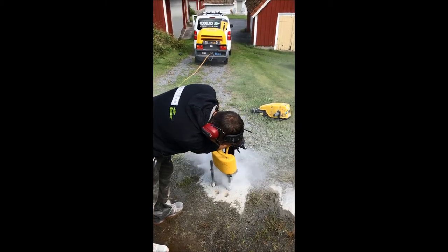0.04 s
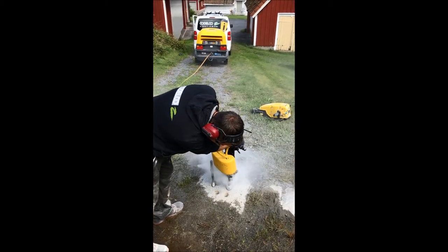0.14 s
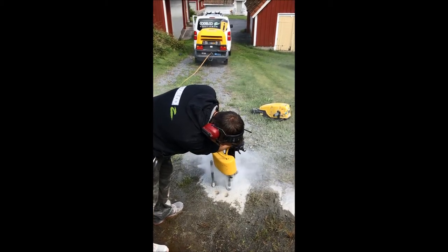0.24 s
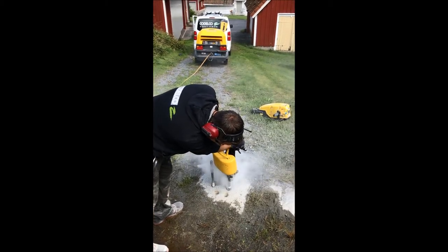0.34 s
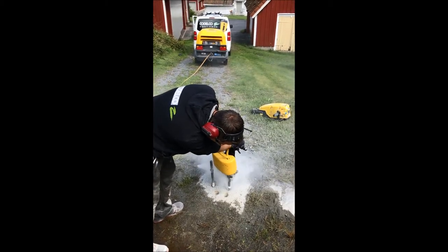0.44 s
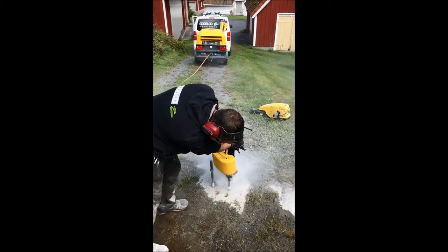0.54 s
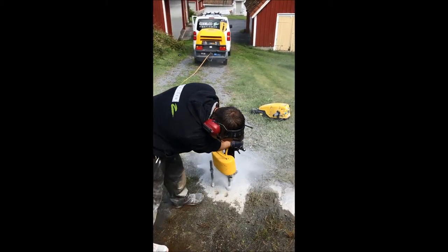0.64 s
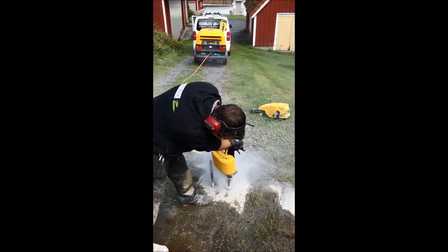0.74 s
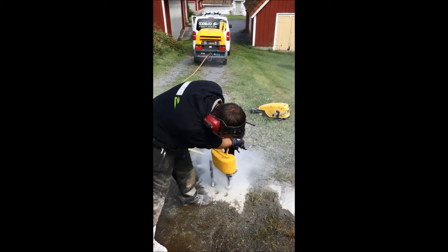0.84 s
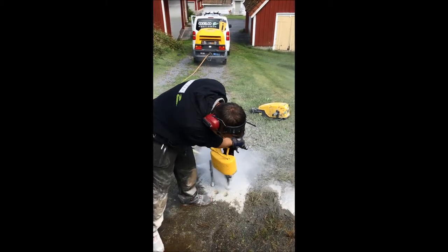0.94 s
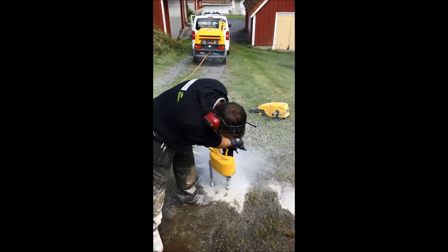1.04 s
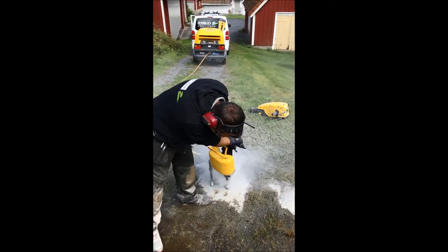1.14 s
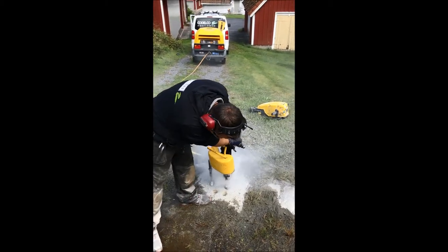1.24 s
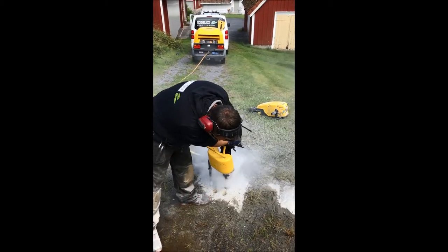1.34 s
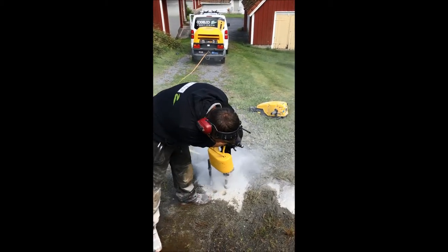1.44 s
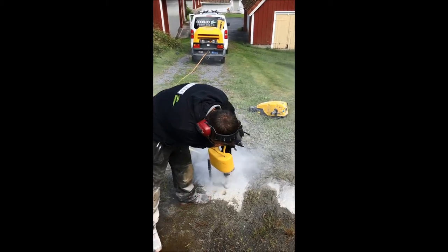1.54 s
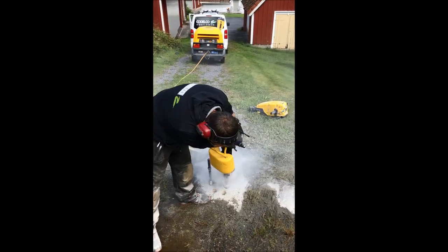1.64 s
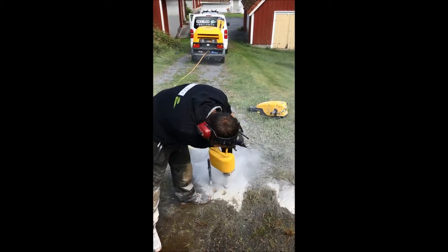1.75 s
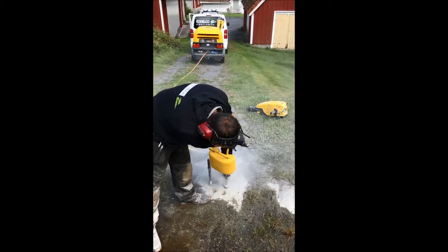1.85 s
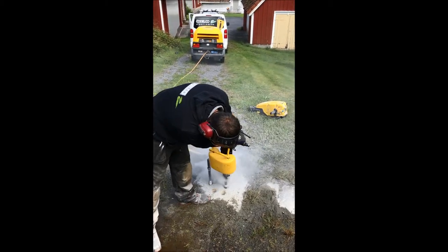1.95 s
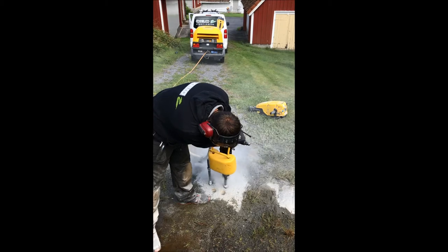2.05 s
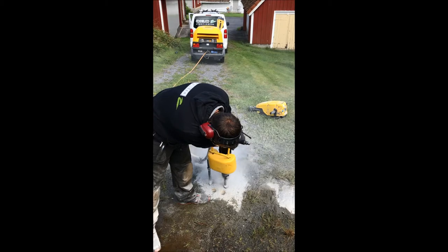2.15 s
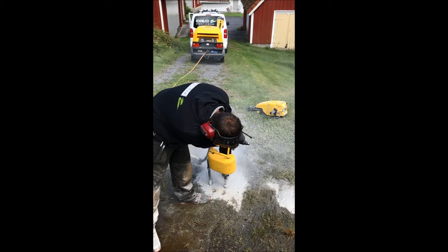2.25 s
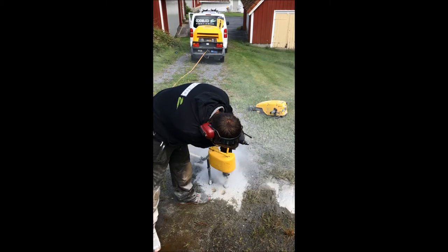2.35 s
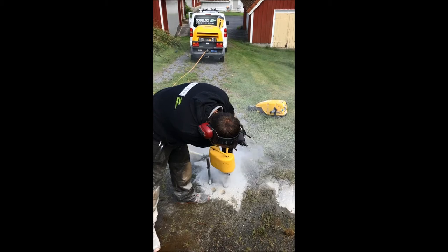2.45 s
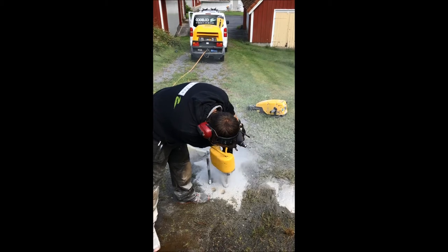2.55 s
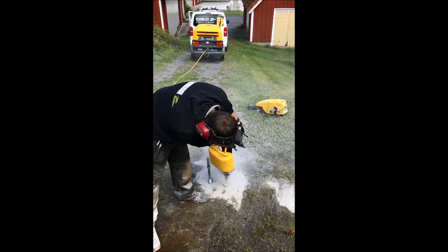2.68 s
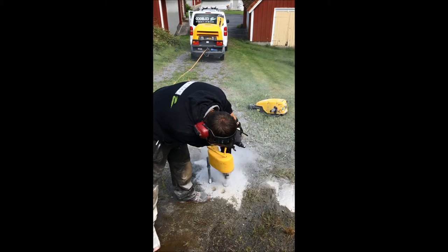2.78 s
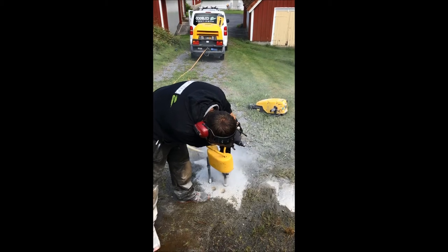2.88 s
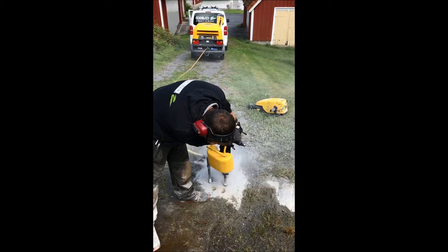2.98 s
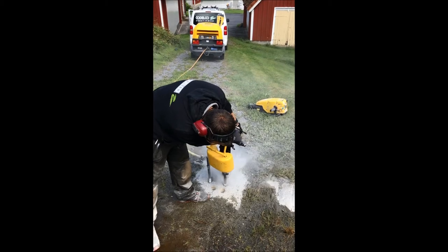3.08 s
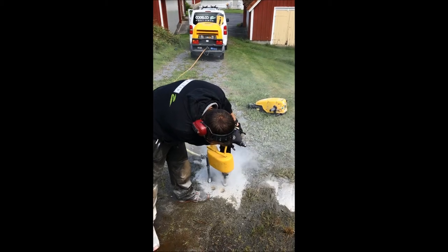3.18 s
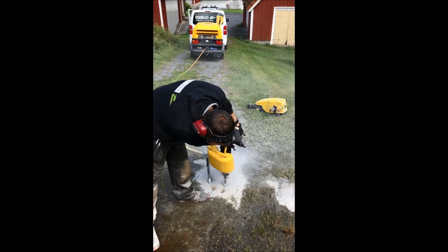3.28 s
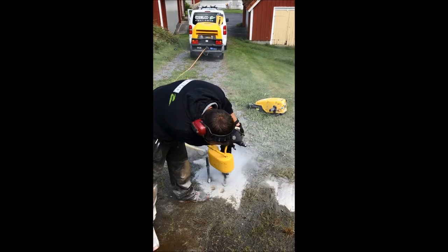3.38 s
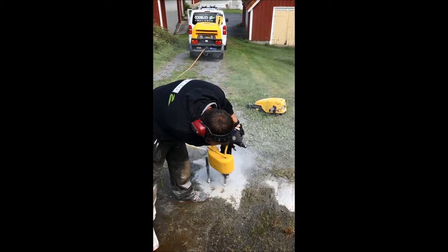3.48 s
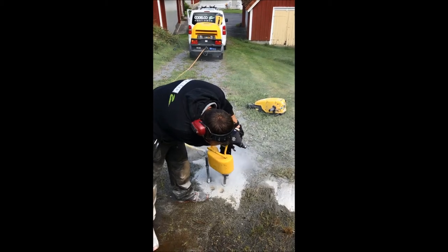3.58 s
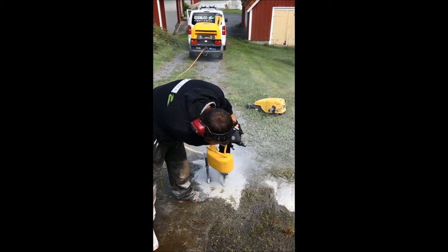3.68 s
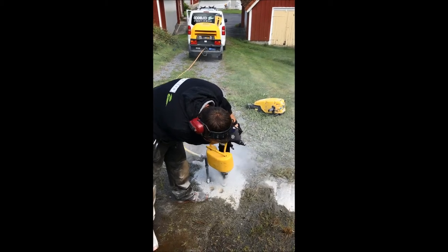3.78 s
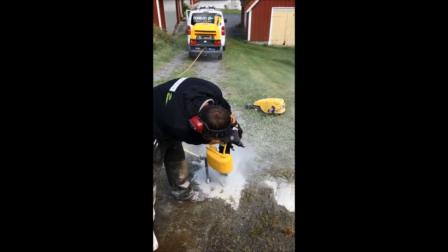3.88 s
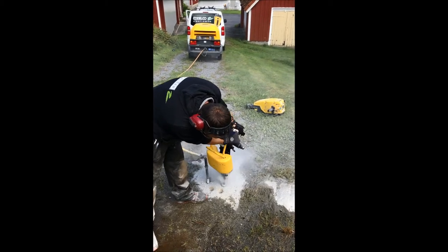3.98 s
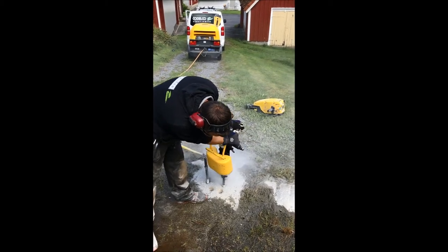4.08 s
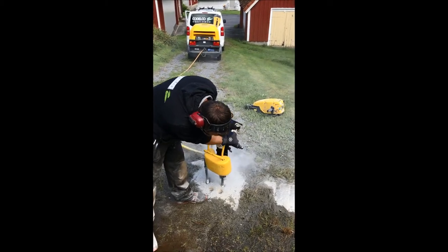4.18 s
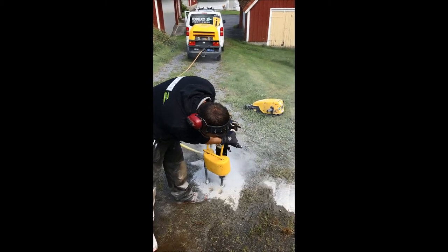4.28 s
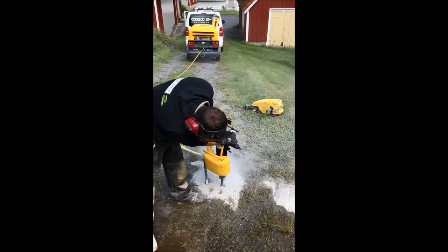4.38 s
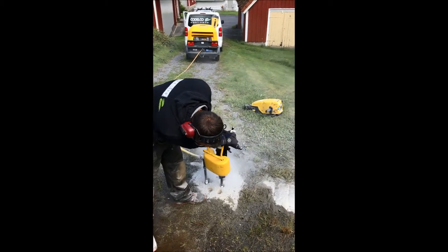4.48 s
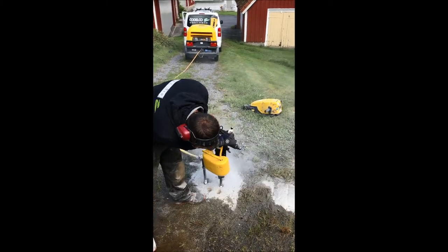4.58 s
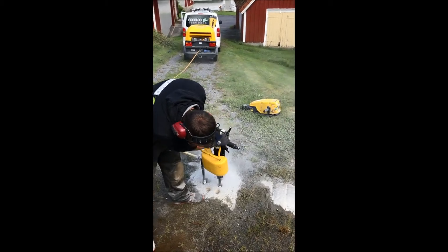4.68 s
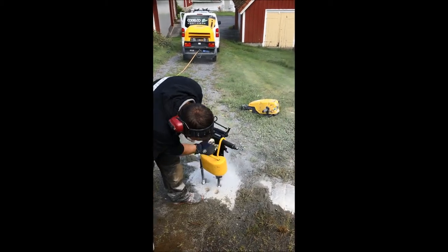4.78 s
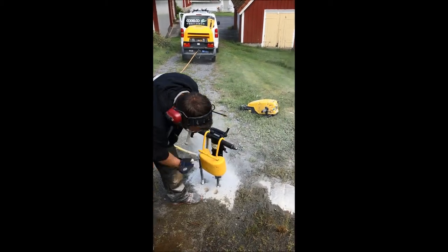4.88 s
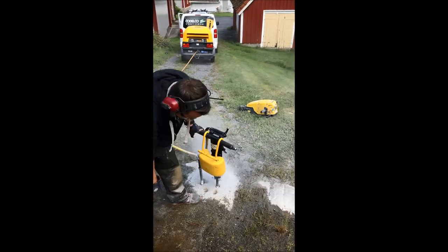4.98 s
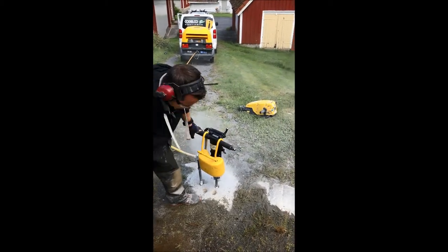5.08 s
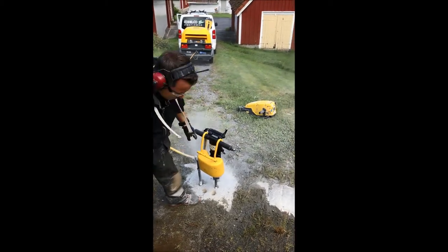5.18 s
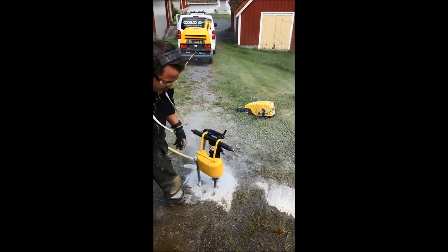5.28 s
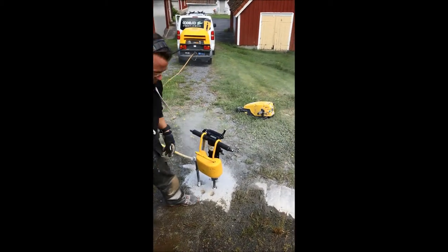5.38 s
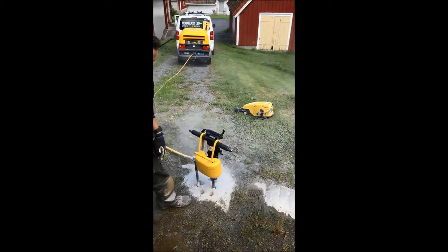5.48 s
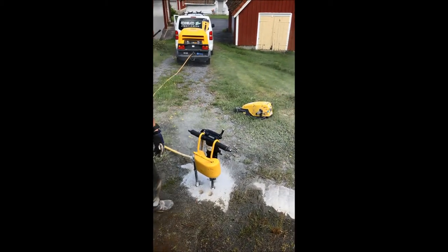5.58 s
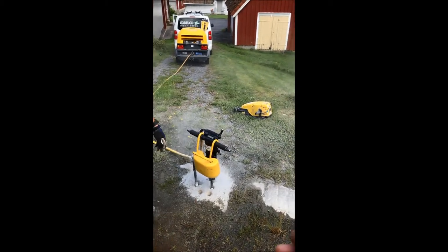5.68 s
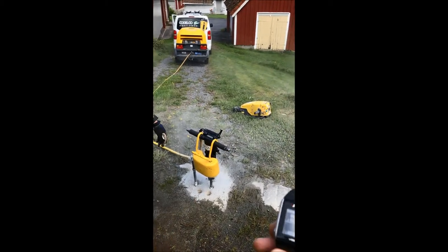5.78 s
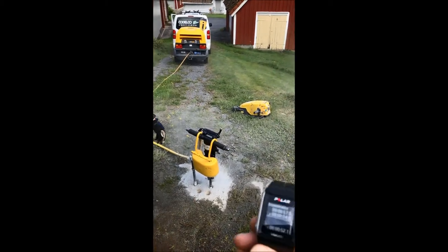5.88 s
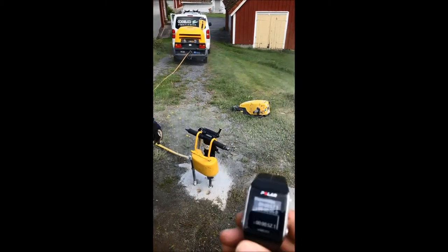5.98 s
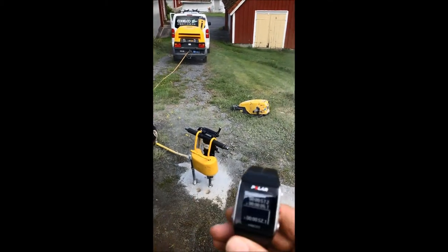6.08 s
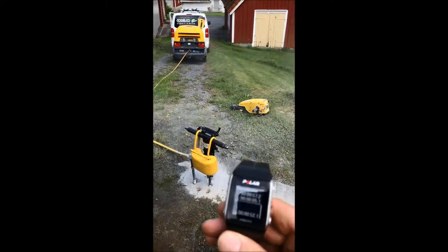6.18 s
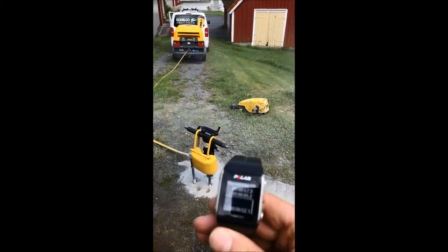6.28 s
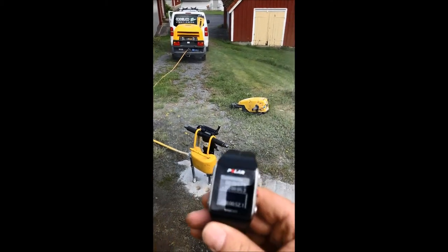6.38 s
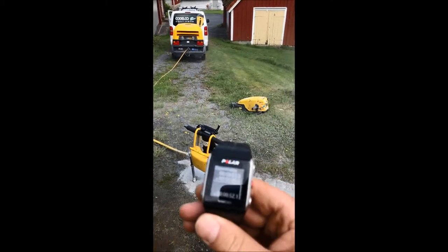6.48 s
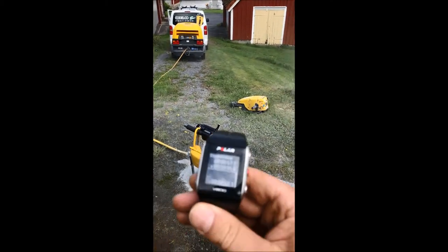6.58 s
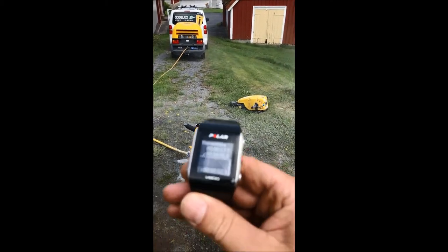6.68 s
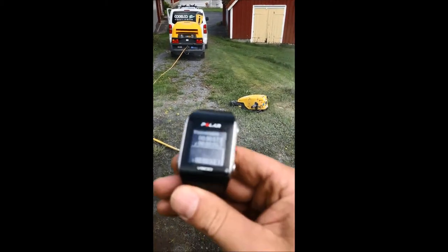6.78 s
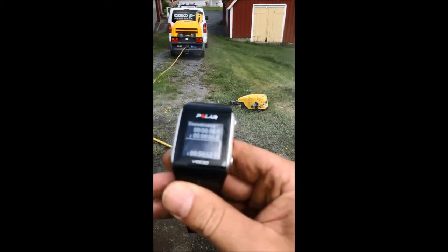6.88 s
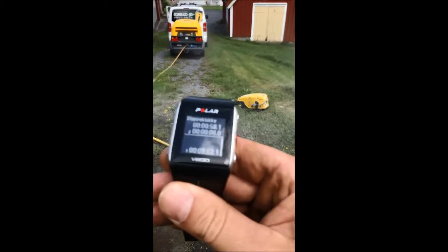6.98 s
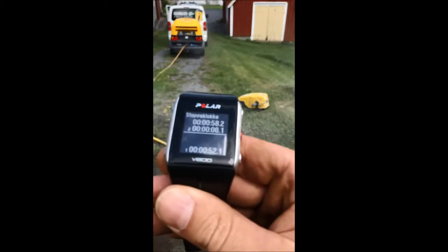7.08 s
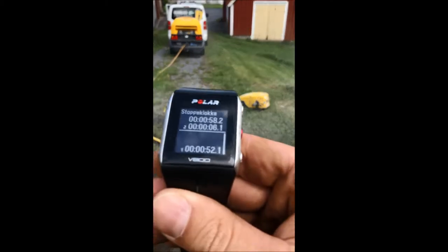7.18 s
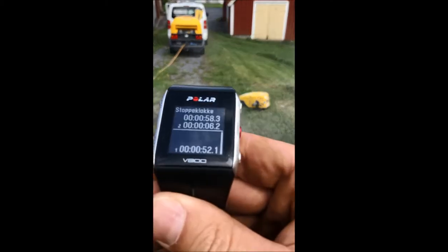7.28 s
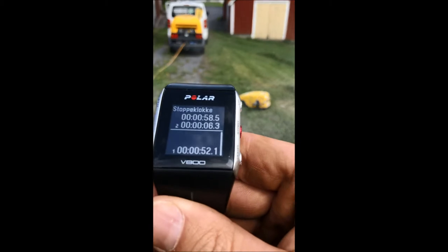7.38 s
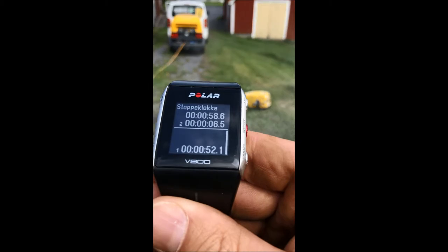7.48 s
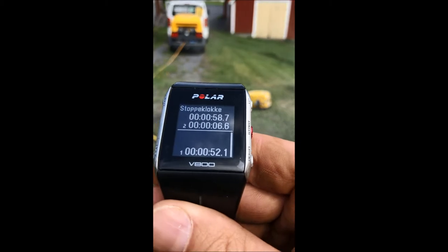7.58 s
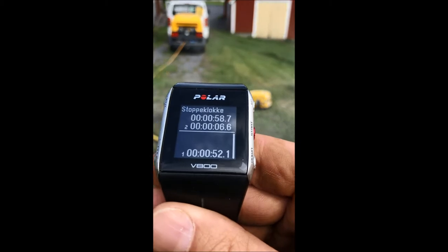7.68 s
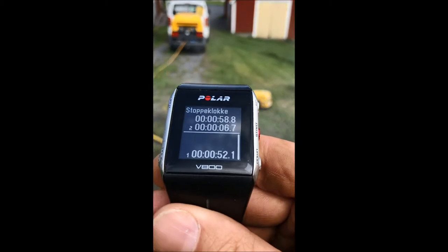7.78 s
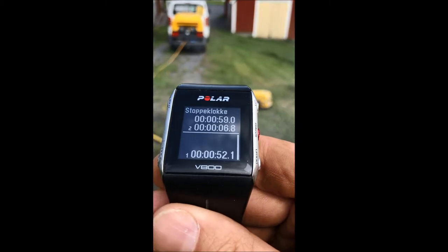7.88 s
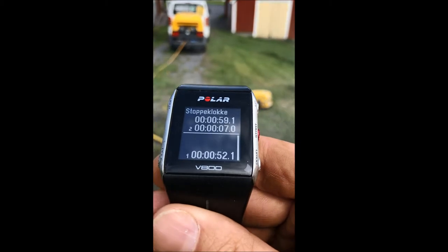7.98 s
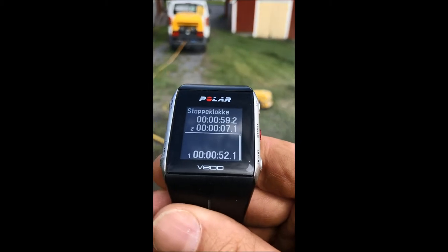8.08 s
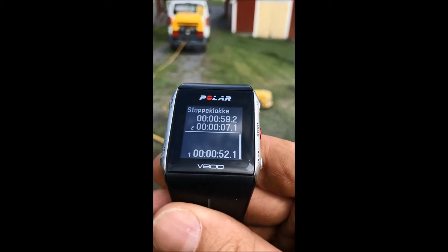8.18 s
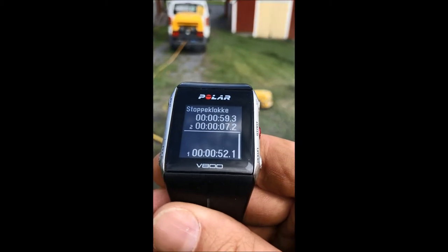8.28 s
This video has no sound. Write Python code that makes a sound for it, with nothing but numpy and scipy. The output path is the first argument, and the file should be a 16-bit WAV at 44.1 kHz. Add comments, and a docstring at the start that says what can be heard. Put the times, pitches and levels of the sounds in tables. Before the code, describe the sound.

A pneumatic rock drill hammers loudly into stone, then stops with a clunk, leaving a diesel compressor idling and air hissing.

```python
"""A pneumatic rock drill hammers stone close by, outdoors, about 32 blows a second.
Each cycle cracks the drill steel and puffs air twice through the muffler. The throttle shuts, the steel
clunks, a valve whistles and the automatic gain recovers. A diesel compressor further off sinks to idle
with a thin whine while air hisses from the hose coupling."""
import sys
import numpy as np
from scipy import signal
from scipy.fft import rfft, irfft
from scipy.io import wavfile
from scipy.ndimage import uniform_filter1d

SR = 44100
rng = np.random.default_rng(int(sys.argv[2]) if len(sys.argv) > 2 else 0)


def materialize(psi):
    """Save the field psi as 16-bit PCM at rate SR to the path in sys.argv[1].

    A 1-D psi becomes a single channel; in a 2-D psi each row is a channel.
    """
    bounded = np.clip(np.atleast_2d(psi).T, -1, 1)
    quanta = np.round(bounded * 32767).astype(np.int16)
    wavfile.write(sys.argv[1], SR, quanta)


N = 367794
TIME_S = np.arange(N) / SR
BIN_HZ = np.fft.rfftfreq(N, 1 / SR)

# hammer speed (time [s], blow rate [Hz])
HAMMER_RATE = [(0.0, 32.18), (0.14, 31.1), (0.3, 33.18), (0.57, 31.49), (1.02, 33.17), (1.2, 31.28),
               (1.56, 31.18), (1.59, 33.91), (2.14, 33.04), (2.21, 30.03), (2.54, 34.69), (2.69, 29.89),
               (2.73, 34.0), (3.26, 33.24), (3.7, 32.94), (3.78, 31.06), (3.87, 35.15), (4.14, 30.87)]
# drill steel and casing (frequency [Hz], width [Hz], gain [dB])
STEEL_MODES = [(1597, 470, 1.5), (2016, 380, 4.5), (2120, 29, 0.5), (2517, 240, 2), (2960, 270, -1),
               (3520, 570, 4), (4350, 230, 3.5), (5000, 81, -5), (5276, 420, 3), (6026, 350, 2),
               (6570, 160, -16), (6300, 130, -15)]
# shank (frequency [Hz], width [Hz], gain [dB])
SHANK_MODES = [(2660, 180, -3), (2755, 320, 4), (2910, 350, -4.5)]
# how freely the shank rings in the hole (time [s], level [dB])
SHANK_LEVEL = [(0, -22), (.85, -17.5), (1.2, -26), (4.14, -21.5)]
# rod, struck square (frequency [Hz], width [Hz], gain [dB])
ROD_MODES = [(3670, 110, 0), (5320, 110, -6.5)]
# crumbling rock (frequency [Hz], gain [dB])
ROCK_SPECTRUM = [(300, -32), (800, 4.5), (1300, -12), (2500, 2.5), (4200, 3.5), (4900, 1.5), (5500, -8),
                 (6800, -8), (8000, -2.5), (16000, 0.5)]
# port jets (frequency [Hz], gain [dB])
JET_SPECTRUM = [(2000, -42), (6000, -20), (7500, -6), (8800, 1.5), (9900, 3.5), (10450, -2), (11000, 5),
                (12500, 1.5), (14000, 5.5), (15600, 1)]
# muffler response (frequency [Hz], gain [dB])
MUFFLER_SPECTRUM = [(25, -44), (60, -18), (110, 5), (200, -3), (330, 0), (440, -1), (560, -5.5), (720, -14),
                    (830, -6.5), (1090, 5.5), (1260, -7), (2000, -21.5)]
# pulsing muffler flow (order [x blow rate], level [dB])
FLOW_ORDERS = [(2, -19), (3, -31), (4, -16), (5, -38), (6, -22.5), (7, -30.5), (10, -31.5), (12, -32)]
# steel settling, valves closing (time [s], level [dB], decay [s], brightness [0-1])
STOP_KNOCKS = [(4.176, -7.5, 0.015, 0.75), (4.196, -28, 0.014, 0.7), (4.256, -26, 0.011, 1),
               (4.484, -21.5, .007, 0.34)]
# diesel speed (time [s], firing rate [Hz])
FIRING_RATE = [(4.3, 97.57), (4.55, 91), (4.7, 79.8), (4.8, 75.7), (5.02, 62.4), (5.13, 58.43),
               (5.3, 61.12), (6.5, 61.6), (7.5, 61.5), (8.34, 62.3)]
# housing resonances swept by the firing tone and its octave (frequency [Hz], half width [Hz], gain [dB])
HOUSING_MODES = [(75, 8, 4), (137.6, 10.8, 10)]
# unequal cylinders and compressor screw (order [x firing rate], level [dB])
HUM_ORDERS = [(1.25, -56), (1.5, -51), (1.75, -57), (2.25, -43.5), (3, -35), (3.25, -38), (3.5, -43),
              (4, -40.5), (4.75, -43), (5, -46.5), (5.75, -52), (9.5, -50), (11, -57), (12.85, -59),
              (16.25, -52)]
# panel booms on the run-down (time [s], order [x firing rate], level [dB], half length [s])
PANEL_BOOMS = [(4.42, 4.33, -38, .09), (4.593, 2, -33, 0.047), (4.6, 4.1, -40, .06),
               (4.703, 3.45, -27.5, 0.036), (4.89, 3.3, -36, 0.027), (5.0, .94, -32, .07),
               (5.13, 4.05, -32, .06), (5.117, 6.1, -39.5, 0.047)]
# engine clatter (frequency [Hz], gain [dB])
CLATTER_SPECTRUM = [(25, -41), (60, 2), (150, 14.5), (270, 5.5), (370, 4), (480, -1.5), (620, 1),
                    (800, 5.5), (1020, 2), (1550, -6), (1950, -6), (2400, -10), (4400, -13), (7000, -19.5)]
# exhaust pipe drone (time [s], level [dB])
DRONE_LEVEL = [(4.7, -52), (5.13, -31.5), (5.75, -41), (6.1, -32.5), (7.95, -35), (8.05, -50), (8.34, -45)]
# leaking coupling (frequency [Hz], width [Hz], gain [dB])
COUPLING_MODES = [(5440, 150, -17), (7100, 150, -4.5), (7560, 160, -1.5), (8400, 190, 0.5),
                  (8880, 130, 2.5), (9400, 180, -5), (10000, 180, -3.5), (10650, 290, 1), (11150, 200, -2),
                  (11620, 95, 2.5), (12060, 150, 4), (12760, 260, 3), (13200, 260, 4), (14000, 220, -3),
                  (14600, 180, -3), (15300, 250, -7)]
# shared envelope of the leak's reedy whistle and the engine whine (time [s], level [dB])
WHISTLE_WHINE_LEVEL = [(4.4, -48), (4.6, -43.5), (5.2, -53), (5.6, -41.5), (6.7, -42), (7.3, -45),
                       (7.8, -43), (8.34, -46)]

STOP_S = 4.14  # throttle shuts
RUNNING = TIME_S < STOP_S


def amp(db):
    """Decibels to gain."""
    return 10 ** (np.asarray(db) / 20)


def unit(x):
    """Scale to rms 1."""
    return x / np.sqrt(np.mean(x ** 2) + 1e-20)


def unit_running(x):
    """Scale to rms 1 while the drill runs."""
    return x / np.sqrt(np.mean(x[RUNNING] ** 2))


def curve(rows):
    """Linear interpolation of (time [s], value) rows."""
    return np.interp(TIME_S, *np.transpose(rows))


def sine(turns):
    """Sine of rms 1."""
    return np.sqrt(2) * np.sin(2 * np.pi * turns)


def noise():
    """White noise, rms 1."""
    return rng.standard_normal(N)


def drift(hz):
    """Random wander up to about hz, rms 1."""
    return unit(irfft(rfft(noise()) / (1 + (BIN_HZ / hz) ** 4), N))


def colour(x, spectrum):
    """Minimum-phase filter; attacks stay sharp."""
    hz, db = np.transpose(spectrum)
    log_hz = np.log(abs(np.fft.fftfreq(4096, 1 / SR)) + 1)
    log_gain = np.log(amp(np.interp(log_hz, np.log(hz), db)))
    taps = np.fft.ifft(np.exp(np.conj(signal.hilbert(log_gain)))).real
    return signal.oaconvolve(x, taps[:2048])[:N]


def ring(x, modes, wander_db=0, wander_hz=3):
    """Damped resonances; each may wander in level."""
    sway = lambda: amp(wander_db * drift(wander_hz)) if wander_db else 1
    return sum(amp(db) * sway() * signal.lfilter(*signal.iirpeak(hz, hz / width_hz, SR), x)
               for hz, width_hz, db in modes)


def kicks(times_s, spread_db=0):
    """One impulse per time, strength scattered by spread_db."""
    train = np.zeros(N)
    samples = np.clip(np.round(times_s * SR).astype(int), 0, N - 1)
    train[samples] = amp(spread_db * rng.standard_normal(len(times_s)))
    return train


def bursts(train, rise_s, decay_s):
    """Rise-and-decay envelope after each impulse."""
    t = TIME_S[:4096]
    shape = (1 - np.exp(-t / rise_s)) * np.exp(-t / decay_s)
    return signal.oaconvolve(train, shape / shape.max())[:N]


def blow_times():
    """Piston timing: speed above the free rate is saved up and spent in sudden early rebounds."""
    free_hz, stumble_turns, start_turns = 31.79, .12, .32
    rate_hz = curve(HAMMER_RATE)
    saved_turns = np.cumsum(np.maximum(rate_hz - free_hz, 0)) / SR
    turns = start_turns + np.cumsum(rate_hz) / SR - saved_turns % stumble_turns
    times_s = TIME_S[1:][(np.diff(np.floor(turns)) > 0) & RUNNING[1:]]
    return np.r_[2 * times_s[0] - times_s[1], times_s]  # starts in mid-cycle


def steel_on_rock(times_s, blow, back, rebound):
    """The struck steel clinks, bounces in its chuck and rattles; rock crumbles under the bit."""
    rattle_power = bursts(blow, .0011, .011) ** 2 + .21 * bursts(rebound, .0031, .014) ** 2
    force = noise() * amp(1.65 * drift(900)) * np.sqrt(rattle_power + .0087 * RUNNING)
    crumble = bursts(blow, .0028, .0036) + .36 * bursts(back, .0023, .0012) + .035 * RUNNING
    grind = noise() * amp(.5 * drift(700)) * crumble
    clink = blow + .67 * kicks(times_s + .0022, spread_db=4.5) + .2 * rebound + .5 * back
    drive = unit_running(force) + .45 * unit_running(clink)
    steel = amp(-10) * unit_running(ring(drive, STEEL_MODES, wander_db=1.4, wander_hz=22))
    rock = amp(-13.5) * unit_running(colour(grind, ROCK_SPECTRUM))
    shank = amp(curve(SHANK_LEVEL)) * unit_running(ring(force, SHANK_MODES))
    ping = amp(-25.5) * unit_running(ring(kicks(times_s + .002, spread_db=5), ROD_MODES))
    uneven_bite = amp(.7 * drift(16))
    return uneven_bite * (steel + rock + shank + ping)


def port_jets(blow, back):
    """Air hisses at each opening of the port."""
    opening = bursts(blow, .0017, .0052) + .52 * bursts(back, .01, .0035) + .034 * RUNNING
    jets = opening * noise() * amp(.59 * drift(900))
    return amp(-10) * unit_running(colour(jets, JET_SPECTRUM))


def gulp(train, start_hz, end_hz, glide_s, length_s):
    """A slug of air: a short tone that falls with the pressure."""
    t = TIME_S[:2048]
    hz = end_hz + (start_hz - end_hz) * np.exp(-t / glide_s)
    slug = np.sin(2 * np.pi * np.cumsum(hz) / SR) * np.exp(-(t / length_s) ** 4)
    return signal.oaconvolve(train, slug)[:N]


def muffler(blow, back):
    """Each stroke vents a gulp, with turbulence and a knock."""
    venting = bursts(blow, .0007, .015) + .88 * bursts(back, .00065, .006)
    churn = unit_running(colour(noise() * venting, MUFFLER_SPECTRUM))
    gulps = gulp(blow, start_hz=1327, end_hz=161, glide_s=.002903, length_s=.0095)
    gulps += .85 * gulp(back, start_hz=1168, end_hz=175, glide_s=.002866, length_s=.0064)
    puffs = unit_running(colour(gulps, MUFFLER_SPECTRUM))
    knock = unit_running(ring(blow + .7 * back, [(840, 130, -3), (1080, 160, 0)]))
    return amp(-15.5) * churn + amp(-10.8) * puffs + amp(-24) * knock


def air_flow(times_s, jitter_turns, decay_s=.022):
    """Muffler flow pulses with the piston and dies once the throttle shuts."""
    count = len(times_s)
    end_s = 2 * times_s[-1] - times_s[-2]
    turns = np.interp(TIME_S, np.r_[times_s, end_s], np.r_[np.arange(count) + jitter_turns, count])
    flow = sum(amp(db) * sine(order * turns) for order, db in FLOW_ORDERS)
    return flow * amp(.8 * drift(15)) * np.exp(-np.maximum(TIME_S - STOP_S, 0) / decay_s)


def drill():
    """The piston strikes and vents, then vents again on the back stroke."""
    times_s = blow_times()
    blow_jitter, back_jitter, rebound_jitter = rng.standard_normal((len(times_s), 3)).T
    times_s = times_s + .00026 * blow_jitter
    blow = kicks(times_s)
    back = kicks(times_s + np.gradient(times_s) * (.46 + .015 * back_jitter))
    rebound = kicks(times_s + .0095 + .0014 * rebound_jitter, spread_db=2)
    strikes = steel_on_rock(times_s, blow, back, rebound)
    air = port_jets(blow, back) + muffler(blow, back) + air_flow(times_s, .0094 * rebound_jitter)
    return strikes + air


def clunks():
    """Last loose knocks of steel and valves."""
    out = np.zeros(N)
    bright = unit(ring(noise(), STEEL_MODES)) + .33 * unit(colour(noise(), JET_SPECTRUM))
    dull = unit(colour(noise(), MUFFLER_SPECTRUM))
    for start_s, db, decay_s, brightness in STOP_KNOCKS:
        t = np.maximum(TIME_S - start_s, 0)
        envelope = (1 - np.exp(-t / .00049)) * np.exp(-t / decay_s)
        out += amp(db) * envelope * (brightness * bright + (1 - brightness) * dull)
    return out


def valve(start_s=4.26, end_s=4.545):
    """Pressure behind the shut throttle: a chirp, a thin rising whistle, a final rasp."""
    t = np.maximum(TIME_S - start_s, 0)
    chirp, dip = np.exp(-t / .0083), np.exp(-t / .04)
    gate = np.clip(np.minimum(t, end_s - TIME_S) / .0034, 0, 1)
    hz = 5110 + 280 * t + 276 * chirp + 18 * drift(160)
    db = -40 - 9 * t + 32 * chirp - 8 * dip + 2.5 * drift(50)
    whistle = amp(db) * sine(np.cumsum(hz) / SR)
    rasp = unit(ring(noise(), [(5360, 110, -11), (5500, 35, 2), (6400, 37, -6)]))
    return gate * (whistle + amp(-43) * rasp * np.exp(-((TIME_S - end_s) / .06) ** 2))


def compressor(idle_hz=61.5, catch_s=5.09, surge_decay_s=.2, unload_db_per_s=2):
    """The diesel stutters down to idle: firing tones, hum, panel booms, clatter and rumble."""
    hz = curve(FIRING_RATE)
    octaves = np.log2(hz / idle_hz)
    stutter = curve([(4.4, 0), (4.6, .004), (5.1, .006), (5.35, 0)])
    turns = np.cumsum(hz * (1 + .0018 * drift(5.6) + stutter * drift(38))) / SR
    tone = lambda order, db: amp(db) * sine(order * turns + rng.random())
    housing_db = lambda order: sum(db * np.exp(-((order * hz - centre_hz) / half_hz) ** 2)
                                   for centre_hz, half_hz, db in HOUSING_MODES)
    # the governor catches the fall with a surge of fuel, then the compressor unloads
    since_s = np.maximum(TIME_S - catch_s, 0)
    surge = (1 - np.exp(-since_s / .03)) * np.exp(-since_s / surge_decay_s)
    load_db = 13 * surge - unload_db_per_s * since_s
    firing = tone(.99, -33.7 + 7.5 * octaves + housing_db(1) + .4 * drift(8.7))
    firing += tone(2, -33.5 - 8 * octaves + housing_db(1.96) + load_db + 1.1 * drift(6.7))
    settled = 1 - np.exp(-(since_s / surge_decay_s) ** 2)
    hum = sum(tone(order, db) * (settled if order > 8 else 1) for order, db in HUM_ORDERS)
    hum *= amp(-18.5 * octaves + .8 * drift(28))
    panels = sum(tone(order, db) * np.exp(-((TIME_S - peak_s) / half_s) ** 2)
                 for peak_s, order, db, half_s in PANEL_BOOMS)
    cylinder_throb = 1 + .071 * np.cos(2 * np.pi * turns) + .08 * np.cos(np.pi * turns / 2)
    clatter = unit(colour(noise() * cylinder_throb * amp(.5 * drift(120)), CLATTER_SPECTRUM))
    clatter *= amp(-37 + 13.5 * octaves + .65 * since_s)
    rumble = unit(colour(noise(), [(15, -20), (45, -8), (90, -4), (200, -4), (800, -72)]))
    return firing + hum + panels + clatter + amp(-46.5 + 19 * octaves) * rumble


def exhaust_pipe():
    """An unsteady pipe resonance that beats against the third firing tone."""
    hz = 206 + 7 * drift(22)
    return sine(np.cumsum(hz) / SR) * amp(curve(DRONE_LEVEL) + 2.5 * drift(20))


def engine_whine():
    """A thin engine tone of steady pitch."""
    return unit(ring(noise(), [(2635, 12, 0)]))


def leak_and_whine(full_pressure_s=4.98, swell_db_per_s=17, bounce_s=.000603):
    """The coupling leaks a reedy whistle and a hiss that swells with pressure; the engine whines."""
    hiss_db = -44.5 - swell_db_per_s * np.maximum(full_pressure_s - TIME_S, 0)
    jet = unit(colour(noise(), [(1500, -20), (3500, 8), (5200, 3), (6000, -28),
                                (7900, -9), (9500, 10), (15500, 3)]))
    hiss = amp(2.5) * unit(ring(noise(), COUPLING_MODES, wander_db=1.5)) + amp(-5.5) * jet
    whistle = unit(ring(ring(noise(), [(2785, 130, 0)]), [(2785, 300, 0)]))
    whine = .3 * engine_whine()
    rasp = unit(ring(noise(), [(2014, 190, 2.5), (3320, 69, 6), (4110, 940, -.5)]))
    envelope = amp(curve(WHISTLE_WHINE_LEVEL) + .98 * drift(22))
    direct = amp(hiss_db) * hiss + envelope * (whistle + amp(-4) * rasp + whine)
    # ground bounce: a comb that slides as the microphone moves
    delay_s = bounce_s * (1 + .067 * drift(.36))
    return direct + .25 * np.interp(TIME_S - delay_s, TIME_S, direct)


def yard(x, wet_db, t60_s):
    """Add faint scatter from ground and barn walls."""
    t = TIME_S[:SR // 2]
    tail = rng.standard_normal(len(t)) * amp(-60 * t / t60_s) * (t > .008)
    echo = signal.oaconvolve(x, tail / np.linalg.norm(tail))[:N]
    return x + amp(wet_db) * colour(echo, [(100, -12), (1000, -8), (3500, 0), (14000, -6)])


def gain_control(x, limit_db=-14, window_s=.163, recover_db_per_s=21):
    """Hold loud sound to the limit; the gain creeps back afterwards."""
    power = uniform_filter1d((x ** 2).mean(0), round(window_s * SR))
    recovery_db = TIME_S * recover_db_per_s
    held_db = np.maximum.accumulate(10 * np.log10(abs(power) + 1e-12) + recovery_db) - recovery_db
    return x / amp(np.maximum(held_db - limit_db, 0))


def scene():
    """Drill in front, compressor behind; mono."""
    front = yard(drill() + clunks(), wet_db=-13, t60_s=.3)
    return (front + compressor() + exhaust_pipe() + leak_and_whine() + valve())[None]


def record(dry):
    """Gain control, soft overload, low-pass."""
    ceiling, cutoff_hz = 1.2, 15800
    limited = ceiling * np.tanh(gain_control(dry) / ceiling)
    lowpass = signal.firwin(1023, cutoff_hz, window=("kaiser", 9), fs=SR)
    return signal.oaconvolve(limited, lowpass[None], "same")


dry = scene()
out = record(dry)
materialize(out)
```